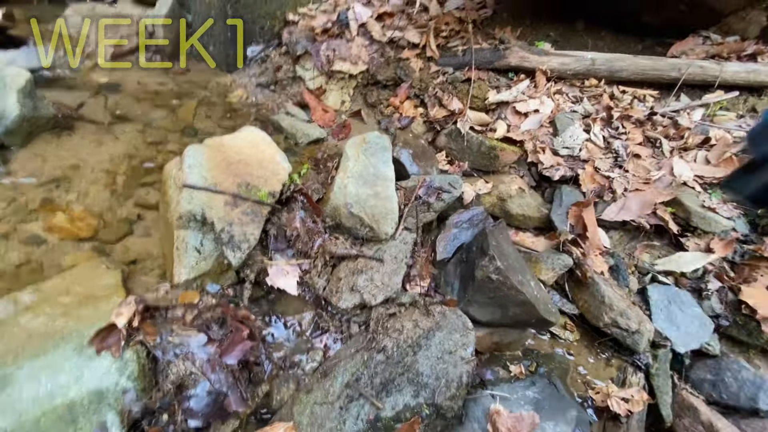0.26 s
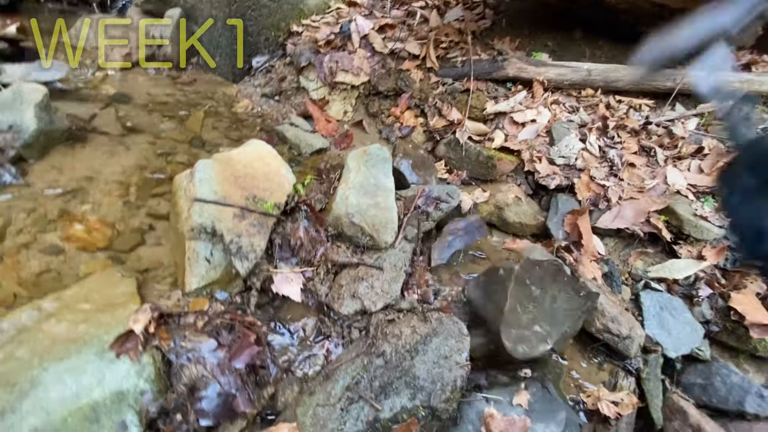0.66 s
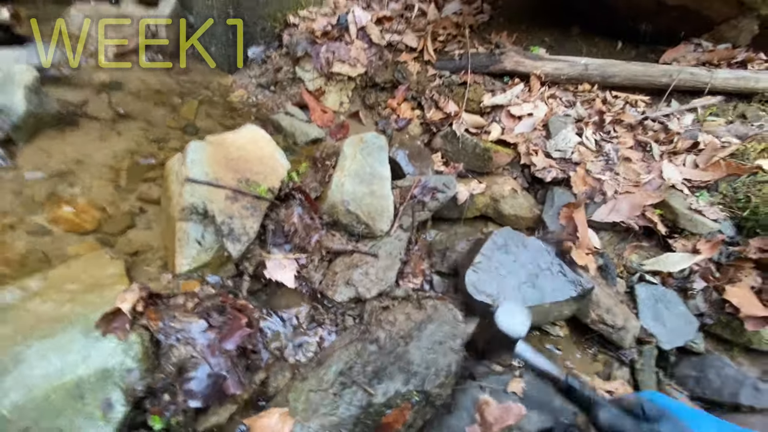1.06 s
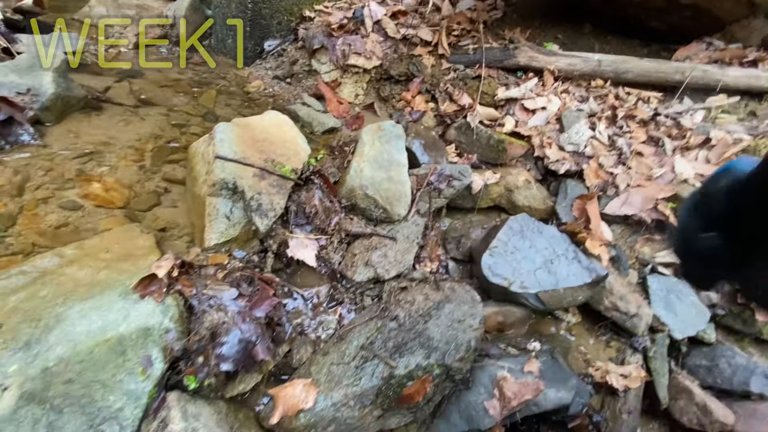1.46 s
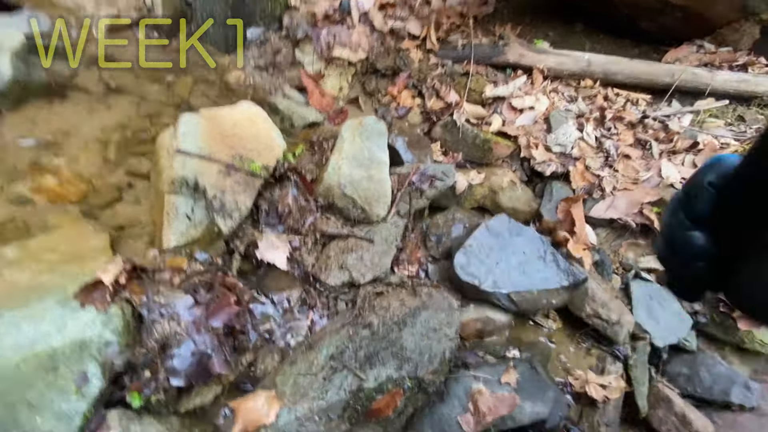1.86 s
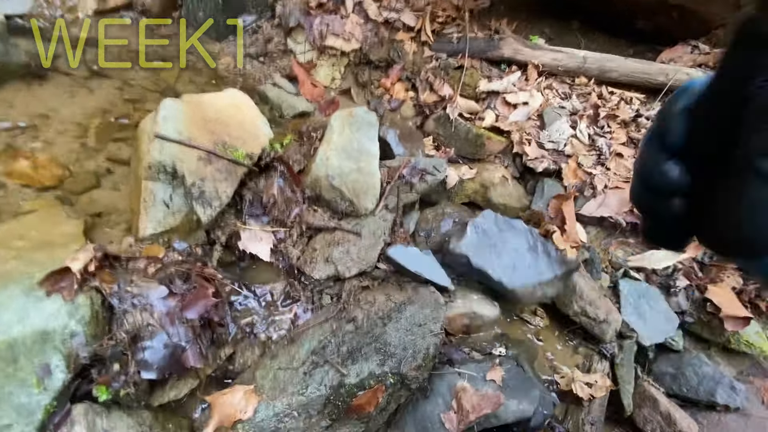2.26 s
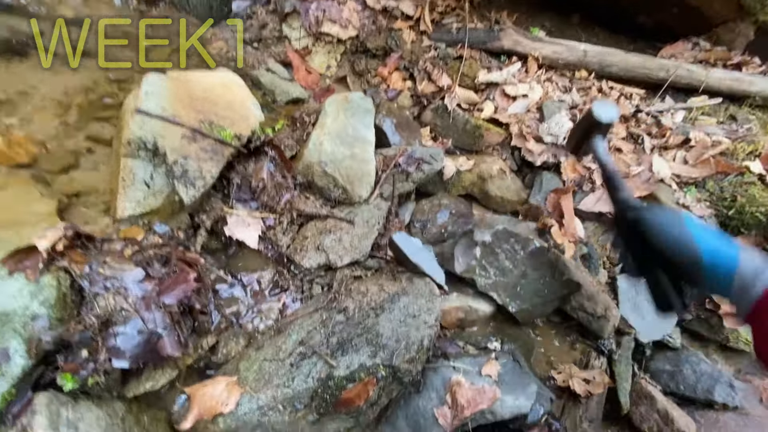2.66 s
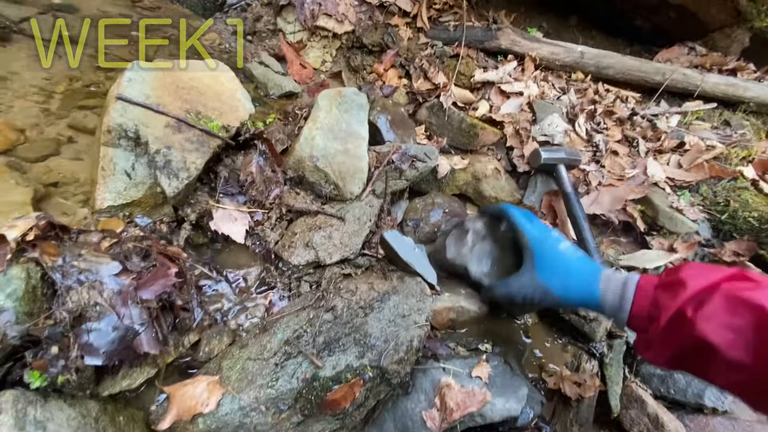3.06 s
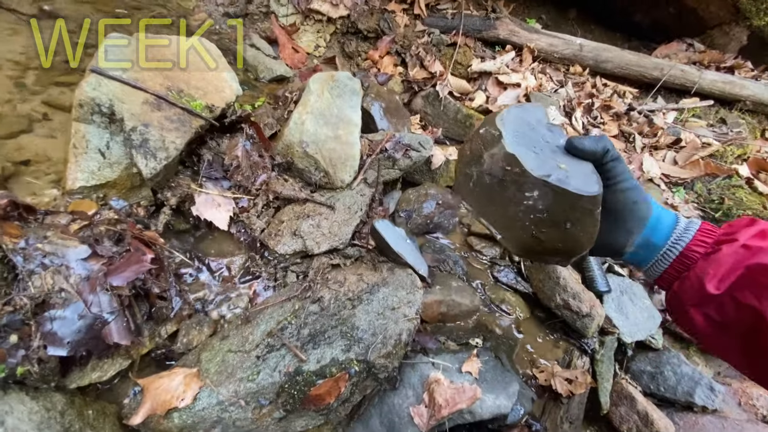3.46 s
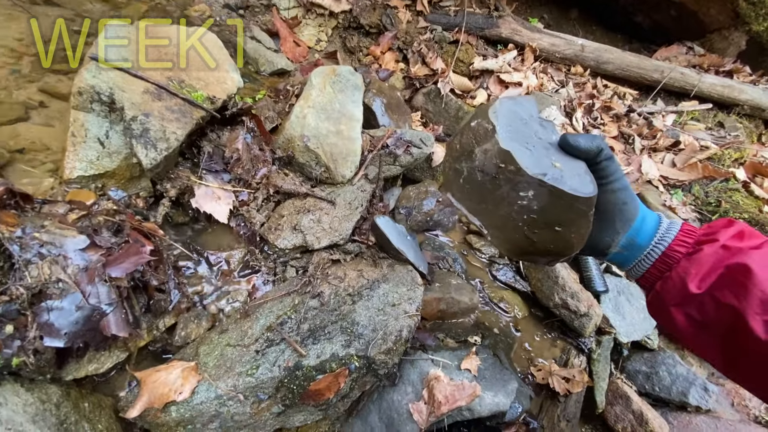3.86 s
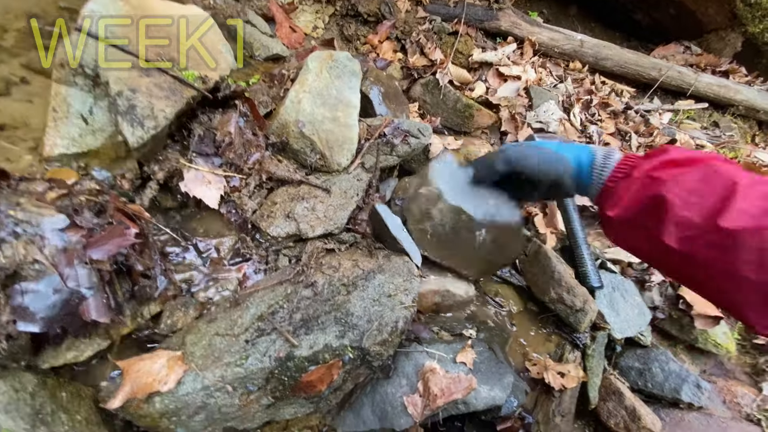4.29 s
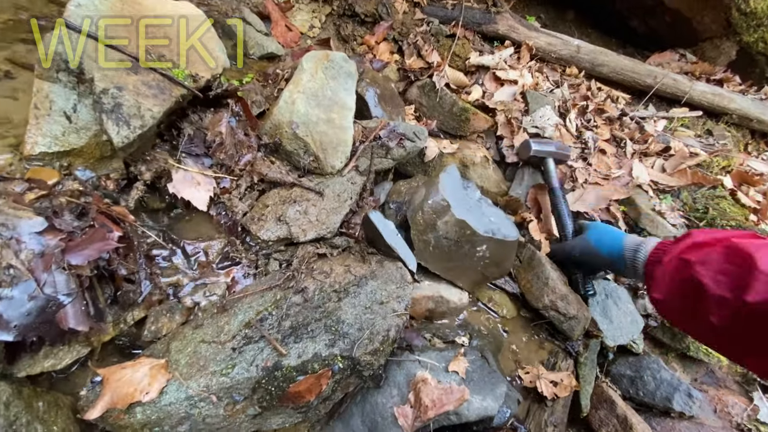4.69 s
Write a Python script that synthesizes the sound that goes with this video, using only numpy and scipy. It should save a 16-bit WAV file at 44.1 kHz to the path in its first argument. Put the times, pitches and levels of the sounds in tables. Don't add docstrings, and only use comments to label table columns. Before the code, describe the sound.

Sharp, dry hammer blows on rock, tumbling stone clacks and gritty ticks, then a stone is set down with a double knock beside a quiet stream.

```python
import sys
import numpy as np
from scipy import signal
from scipy.fft import rfft, irfft, next_fast_len
from scipy.io import wavfile
from scipy.ndimage import uniform_filter1d

SR = 44100
rng = np.random.default_rng(int(sys.argv[2]) if len(sys.argv) > 2 else 0)


def store_pcm(level_fs):
    pcm = np.round(np.clip(level_fs, -1, 1) * 32767).astype(np.int16)
    wavfile.write(sys.argv[1], SR, np.atleast_2d(pcm).T)


def volts_from_db(level):
    exponent = np.asarray(level, float) / 20
    return 10 ** exponent


N = 213179

# pitch_hz, level_db per Hz
RUMBLE_COLOUR = [(12, -28.5), (20, 1.5), (103, -3.5), (193, -3.5), (289, -23.5), (319, -13.5), (400, -6),
                 (520, -5.5), (880, -120)]
# pitch_hz, level_db per Hz
BUFFET_COLOUR = [(12, -34.5), (20, -8.5), (102, 1.5), (136, -5.5), (190, -10.5), (325, -16.5), (450, -35.5),
                 (580, -63.5), (990, -120)]
# pitch_hz, level_db per Hz
TRICKLE_COLOUR = [(120, -49), (200, -7.5), (272, -14.5), (354, -8), (513, -9.5), (894, -3), (1510, -1.5),
                  (2980, -3.5), (3530, -3.5), (8000, -15.5), (10400, -43.5), (17600, -120)]
# pitch_hz, level_db per Hz
RUSTLE_COLOUR = [(1500, -28), (3000, -18.5), (6000, -6.5), (9000, -5.5), (12000, -7.5), (15700, -17.5)]
# pitch_hz, correlation (-1 to 1)
LIKENESS = [(60, -0.52), (180, -0.39), (550, 0.33), (1650, -0.36), (4970, 0.063), (15000, -0.11)]
# time_s, trickle_db
STIRRING = [(0, -43.5), (.21, -52.5), (.44, -42), (.62, -47.5), (.97, -51), (1.06, -43.5), (1.3, -48.5),
            (1.9, -49), (2.18, -45.5), (2.45, -50), (2.6, -46.5), (2.78, -50), (2.93, -46), (3.3, -52),
            (4.1, -53), (4.25, -46.5), (4.6, -49.5), (4.83, -50)]
# middle_s, length_s, rustle_db
SLEEVE_BRUSHES = [(.06, .22, -50), (.37, .28, -50), (.58, .1, -50), (.79, .2, -50), (.95, .08, -49),
                  (1.2, .22, -50), (1.55, .09, -49), (1.74, .13, -48), (1.92, .09, -48), (2.2, .45, -49.5),
                  (2.63, .24, -47), (2.92, .14, -48), (4.27, .24, -49), (4.48, .2, -53)]
# start_s, length_s, buffet_db
ARM_SWINGS = [
    (1.415, .085, -37),
    (1.49, .1, -42),
    (2.74, .09, -51),
    (2.97, .13, -45),
]
# start_s, peak_db, pitch_hz
PLINKS = [(.1685, -43.5, 2120), (.2914, -39, 2380), (.3311, -33.5, 2960), (1.513, -29, 3360),
          (2.2258, -33.5, 3460), (2.2942, -35, 3700), (2.8055, -42.5, 3290), (3.2216, -40.5, 2600),
          (3.6287, -43.5, 2640), (3.7668, -32.5, 4570), (3.8142, -44, 2990), (3.9983, -35.5, 2040),
          (4.0467, -42, 1940), (4.2188, -28.5, 3710), (4.6319, -37, 3940), (4.6843, -45, 2620)]
# pitch_hz, t60_s
BANK_DECAY = [(150, 0.22), (1000, 0.075), (4000, 0.06), (14000, 0.02)]
# start_s, peak_db, pitch_hz
BED_THUDS = [(.04, -36, 110), (.1, -40, 90), (.398, -9, 190), (.452, -19.5, 200), (.535, -35, 140),
             (.738, -35, 200), (.811, -31, 230), (.986, -12.5, 150), (1.028, -17, 270), (1.125, -32, 240),
             (1.594, -15, 170), (1.76, -33, 100), (2.013, -9.5, 210), (2.341, -32, 190), (2.483, -25, 200),
             (2.512, -25, 180), (2.871, -21, 229), (3.175, -37, 200), (4.295, -25, 240), (4.3362, -12, 185),
             (4.437, -32, 200)]
# start_s, length_s, level_db
SAND_SCRAPES = [
    (.412, .06, -35),
    (2.48, .032, -29),
    (2.515, .022, -31),
    (2.852, .03, -37),
    (4.283, .031, -29),
    (4.343, .032, -33),
]
# start_s, peak_db, pitch_hz, pan_db
FLAKE_HITS = [(.0564, -26, 4290, 5), (.1905, -33, 6600, 5), (.2507, -38, 3840, 11),
              (.2994, -33, 5590, -2.2), (.462, -23, 3800, -6), (.7645, -28, 4410, -2.2),
              (.8015, -29, 5000, -12.5), (.8405, -29, 5260, 11.5), (1.0256, -15, 3850, 1.5),
              (1.029, -19, 3850, 6.5), (1.0495, -24, 3100, -3), (1.7953, -31, 4800, 1.5),
              (2.0445, -13, 3400, 4.5), (2.0585, -7, 3900, -8), (2.5284, -27, 4010, -3.5),
              (2.689, -34, 3650, -7), (2.8479, -24, 4340, -19), (3.3092, -37, 7450, 5),
              (3.545, -39.5, 2970, 17), (3.8396, -40.5, 2620, 9), (3.903, -33, 3900, 12),
              (4.6853, -31, 2620, 3)]
# start_s, peak_db, pitch_hz
GRIT_SPRAYS = [(1.0302, -14, 4600), (1.0495, -30, 6000), (1.0592, -22, 2510), (1.0691, -27, 4880),
               (1.0795, -21, 4250), (1.1078, -33, 6000), (1.744, -30, 12000), (2.0592, -13, 6000),
               (1.0904, -26, 4850), (1.7188, -23, 6800), (1.8933, -34, 4690), (2.4758, -31, 4400),
               (2.4845, -23, 4000), (2.5, -21, 3930), (2.5102, -13, 4000), (2.568, -36, 4000),
               (2.642, -38, 10500), (3.1787, -36, 2620), (3.472, -43, 2620), (4.2853, -28, 3500),
               (4.338, -29, 4500)]
# start_s, peak_db
HEAD_CHATTER = [
    (2.0414, -4),
    (2.0504, -12),
    (2.0594, -1.2),
    (2.0864, -25),
]
# pitch_hz, level_db per Hz
GRIT_COLOUR = [(500, -28.5), (2500, -6.5), (6000, -5), (11000, -6.5), (15700, -16)]
# start_s, peak_db, pitch_hz, t60_s
SLAB_RINGS = [(.022, -10.5, 425, 0.078), (.500, -37, 1390, 0.049), (1.612, -16, 675, .07),
              (2.52, -25, 1150, .05), (2.52, -26, 1650, .05), (2.859, -30, 3250, .03),
              (2.059, -14, 11300, 0.032), (1.000, -16, 696, 0.16), (1.170, -33, 668, 0.091),
              (1.805, -27, 1277, 0.057), (2.486, -16, 684, .12), (2.878, -36, 713, 0.2)]
# start_s, peak_db, pitch_hz
FACE_SNAPS = [(.5334, -7, 1000), (.5366, -6, 900), (.8197, -13, 1600), (1.0258, -5, 1900),
              (.7377, -17, 1000), (.8953, -30, 900), (2.0139, -5, 2000), (1.0262, -15, 6500),
              (1.031, -12, 6500), (2.0592, -7, 6500), (4.3245, -23, 9000), (1.0302, -3, 2000),
              (1.6357, -5, 1500), (1.7625, -3, 900), (2.0449, -10, 3600), (2.0515, -16, 3500),
              (2.0588, -1, 3500), (2.34, -4, 740), (2.5028, -22, 3800), (2.513, -3, 1500),
              (2.8482, -16, 2500), (4.2855, -21, 3300), (4.3262, -14, 1900), (4.327, -15, 4200),
              (4.338, -5, 800), (4.3402, -8, 2100), (4.4368, -6, 800)]
# start_s, peak_db,
# pitch_hz, held_s
HELD_MODES = [(.3965, -10, 835, .011), (.399, -8, 1280, .01), (.401, -11, 1045, .007),
              (.399, -13, 605, .009), (.398, -15, 420, .01), (.402, -19, 2340, .009),
              (.400, -18, 3470, .01), (.411, -13, 1300, .006), (.984, -9, 870, .013),
              (.9845, -5, 1325, .0145), (.986, -11, 1030, .014), (.986, -16, 1470, .012),
              (.985, -20, 2067, .01), (1.0265, -13, 2945, .007), (1.0255, -16, 3345, .01),
              (1.0285, -8.5, 960, .006), (1.028, -11, 1254, .007), (1.029, -12, 600, .006),
              (1.597, -4, 1300, .01), (1.599, -9.5, 665, .012), (1.594, -11, 1040, .014),
              (1.594, -11.5, 885, .008), (1.599, -17, 1590, .009), (1.596, -19, 2970, .011),
              (1.599, -17, 3795, .009), (2.015, -6, 1305, .008), (2.0135, -12, 1045, .013),
              (2.0135, -16, 820, .013), (2.017, -14, 675, .011), (2.014, -16, 1580, .013),
              (2.017, -17, 1840, .01), (2.014, -21, 2470, .012), (2.014, -22, 2680, .013),
              (2.51, -11, 1220, .006), (2.51, -14, 1070, .006), (2.51, -17, 1500, .005),
              (2.511, -17, 1650, .006), (2.8475, -19, 1440, .004), (2.851, -20, 1140, .006),
              (2.8475, -18, 3250, .004), (2.853, -27, 2320, .004), (4.324, -14, 1265, .004),
              (4.324, -16, 1745, .005), (4.324, -13, 470, .005), (4.324, -17, 866, .004),
              (4.3364, -4.5, 915, .004), (4.337, -9, 700, .004), (4.338, -14, 1470, .003),
              (4.345, -11, 690, .004),
              (.533, -16, 560, .005), (.533, -23, 1465, .006), (.5345, -12.5, 860, .0085),
                 (1.7621, -11, 595, .003), (1.7622, -14, 860, .002), (1.762, -19, 1270, .006),
                 (2.3396, -14, 605, .002), (2.349, -29, 620, .003), (4.4364, -16, 665, .0015),
                 (4.436, -20, 1070, .002), (.8193, -30, 950, .001), (.8193, -29, 2600, .001),
                 (1.6352, -14.5, 930, .002), (1.6352, -22, 1700, .001), (2.041, -18, 1150, .003),
                 (2.041, -19, 1750, .003), (2.033, -19, 1150, .003), (2.063, -24, 2050, .004),
                 (2.482, -25, 1650, .008), (2.0585, -18, 1550, .001), (4.2845, -22, 1050, .002),
                 (4.2845, -25, 1950, .002), (2.874, -33, 2100, .002), (.533, -28, 420, .005),
                 (1.000, -19, 1050, .005), (1.028, -20, 390, .008), (1.0265, -19, 3150, .006),
                 (1.596, -17, 480, .014), (1.598, -15, 580, .01), (1.612, -24, 520, .012),
                 (2.51, -24, 400, .006), (2.51, -21, 620, .006), (2.8475, -27, 1900, .004),
                 (4.337, -16, 400, .008), (4.337, -17, 500, .005), (4.344, -19, 1280, .003),
                 (4.436, -25, 460, .003), (2.0585, -24, 1100, .002)]
# start_s, peak_db, ring_hz, pan_db
HARD_KNOCKS = [(.021, -18, 423, -3), (.040, -15, 800, -4), (.054, -17, 900, -8), (.4518, -4, 560, 5),
               (.5325, -14, 1300, -1.5), (.7365, -20, 877, -4.5), (.8192, -23, 900, -3.5),
               (.822, -21, 2050, -1.5), (1.0255, -4, 1900, -8.5), (1.029, 2, 800, 0),
               (1.126, -12.5, 570, 5), (1.626, -15, 1100, -4.5), (1.7612, -12, 1300, -5),
               (2.3388, -21, 2300, -.6), (2.494, -11, 640, -8), (2.509, -8, 1250, -.6),
               (2.512, -12, 1420, -1.5), (2.545, -20, 600, -1.5), (4.284, -16, 1000, -.6),
               (4.3, -14, 480, -.6), (4.324, -10, 1800, -4.5), (4.3255, -9, 520, -.6), (4.3358, -3, 950, 0),
               (4.3385, -4, 1900, -4), (4.344, -8, 600, 3), (4.4356, -18, 1500, -1.5)]
# start_s, peak_db, ring_hz
SETTLING_TAPS = [(.067, -30, 1500), (.086, -28.5, 426), (.115, -33.5, 975), (.472, -23, 1120),
                 (.594, -22, 850), (.625, -25, 900), (.635, -24.5, 1100), (.774, -32.5, 585),
                 (.811, -25, 1340), (.894, -32, 950), (.916, -31, 493), (1.058, -16, 1450),
                 (1.713, -27, 650), (2.126, -26, 460), (2.243, -37.5, 783), (2.268, -29.5, 402),
                 (2.374, -32, 880), (2.396, -24.5, 720), (2.945, -25.5, 1240), (3.109, -30, 1100),
                 (4.294, -18.5, 850), (4.365, -27, 480), (4.381, -33, 430), (4.397, -33, 1400),
                 (4.457, -33, 1000), (4.514, -35.5, 436)]
# start_s, peak_db, ring_hz, pan_db
SANDY_GRINDS = [
    (2.0445, -16, 1900, -5.5),
    (2.073, -20.5, 1310, -2.5),
    (2.168, -30, 1710, -2.2),
    (2.482, -21, 705, 5),
    (2.871, -24, 1200, -2.5),
    (3.18, -32, 500, 3),
]
# start_s, peak_db, ring_hz, crack_db, pan_db
HAMMER_BLOWS = [
    (0.396, -2, 800, -19.5, -1),
    (0.984, 5, 1040, -25, -0.5),
    (1.5945, 3.5, 1185, -23.5, 0.5),
    (2.0132, 5.5, 1080, -23.5, 4),
    (2.847, -20, 1550, -14.5, 0.5),
]
# pitch_hz, strength_db
ROCK_MODES = [(430, 2.5), (520, 0.5), (600, 3.5), (685, 2.5), (780, -2.5), (865, 4), (960, 0), (1055, -0.5),
              (1180, -5.5), (1295, 0.5), (1485, -2.5), (1690, 1), (1870, -2.5), (2040, -7), (2370, -5.5),
              (2690, -7), (2960, -5.5), (3370, -7.5), (3810, -6), (4220, -6)]
# pitch_hz, level_db, t60_s
STEEL_MODES = [(7900, -25.5, .03), (9000, -41, .03), (11400, -24, .04)]
# pitch_hz, level_db per Hz
CRACK_COLOUR = [(60, -25), (250, -12), (1000, 7.5), (3000, -2.5), (6000, -13.5), (11000, -21.5),
                (16000, -26.5)]
# pitch_hz, left_over_right_db
PORT_BALANCE = [(60, 0.5), (600, -0.5), (1000, -1.5), (1600, 1), (3000, 1), (14000, 1)]
# pitch_hz, left_over_right_db
BODY_PAN = [(450, 3), (600, 8), (850, -3), (1040, -8), (1300, -2), (1500, 0), (3000, 3)]
# pitch_hz, left_lead_rad
BODY_LEAD = [(450, .4), (650, -.3), (900, -.7), (1050, 1), (1300, 1.3), (1550, 0), (2000, .4), (3200, 1.2)]

# t60_s at 1 kHz, full_scale_grit_db, grit_gain_db per dB softer, grit_brightness
HARD, SOFT, SANDY = (.019, -31, .4, 1.2), (.028, -30, .35, 1.8), (.028, -17, .35, 2.2)
# full_scale_t60_s, t60_gain_s per dB softer, hiss_db, hiss_gain_db per dB softer
FLAKE, SPRAY, HEAD = (.015, .0001, -32, .3), (.02, .0008, -12, 0), (.011, 0, -28, 0)
LEFT_RIGHT = np.array([[.5], [-.5]])


def unit(x):
    return x / np.sqrt(np.mean(x ** 2) + 1e-20)


def along(points, hz):
    f, v = np.transpose(points)
    return np.interp(np.log(hz + 1), np.log(f + 1), v)


def filtered(x, response):
    n = x.shape[-1]
    size = next_fast_len(n + 512)
    return irfft(rfft(x, size) * response(np.fft.rfftfreq(size, 1 / SR)), size)[..., :n]


def canvas(seconds):
    return np.zeros((2, N)), np.arange(int(SR * seconds)) / SR


def add(track, start_s, sound, pan_db):
    at = track[:, round(start_s * SR):][:, :sound.shape[1]]
    at += sound[:, :at.shape[1]] * volts_from_db(pan_db * LEFT_RIGHT)


def swell(start_s, length_s):
    return np.sin(np.pi * np.clip((np.arange(N) / SR - start_s) / length_s, 0, 1)) ** 2


def burst(t, colour, t60, rise=.00024):
    puff = unit(filtered(rng.standard_normal((2, len(t))), colour))
    return puff * volts_from_db(-60 * t / (abs(t60) + .003)) * (1 - np.exp(-t / rise))


def rush(colour, patchy_db, patch=(8, 6)):
    z = signal.stft(rng.standard_normal((2, N)), nperseg=256)[2]
    field = uniform_filter1d(rng.standard_normal(z.shape[1:]), patch[0], 0)
    field = uniform_filter1d(field, patch[1], 1)
    pair = signal.istft(z * volts_from_db(patchy_db * unit(field)), nperseg=256)[1][:, :N]

    def mid_side(hz):
        angle = np.arccos(np.clip(along(LIKENESS, hz), -1, 1)) / 2
        return volts_from_db(along(colour, hz)) * [np.cos(angle), np.sin(angle)]

    mid, side = filtered(pair, mid_side)
    return unit(np.array([mid + side, mid - side]))


def surroundings():
    t = np.arange(N) / SR
    trickle_db = np.interp(t, *np.transpose(STIRRING))
    stirred_db = trickle_db + 52
    shake = sum((t > s) * volts_from_db(-34 + db - 60 * np.abs(t - s) / .35) for s, db, hz in BED_THUDS)
    rumble = volts_from_db(-61 + .4 * stirred_db) + shake
    brush = sum(volts_from_db(db) * swell(s - length / 2, length) for s, length, db in SLEEVE_BRUSHES)
    rustle = np.hypot(volts_from_db(-57.5 + .4 * stirred_db), brush)
    low = rumble * rush(RUMBLE_COLOUR, patchy_db=3.5)
    water = volts_from_db(trickle_db + 2.5) * rush(TRICKLE_COLOUR, patchy_db=4, patch=(6, 3))
    leaves = rustle * rush(RUSTLE_COLOUR, patchy_db=4.5, patch=(24, 2))
    return low + water * volts_from_db(1.18 * LEFT_RIGHT) + leaves * volts_from_db(.84 * LEFT_RIGHT)


def arm_swings():
    level = sum(volts_from_db(db) * np.sqrt(swell(s, length)) for s, length, db in ARM_SWINGS)
    return level * rush(BUFFET_COLOUR, patchy_db=4, patch=(8, 5))


def bubble(t, hz, cycles):
    u = t * hz / cycles
    return np.sin(2 * np.pi * hz * t * (1 + .053 * u)) * u * np.exp(1 - 4 * u) * 4


def bubbles(count=1100):
    out, t = canvas(1 / 30)
    for s, db, hz in PLINKS:
        add(out, s, volts_from_db(db - 6.5) * np.tile(bubble(t, hz, cycles=24), (2, 1)), pan_db=13)
    for when, size, pitch, side in rng.random((count, 4)):
        tiny = bubble(t[:500], 1000 * 11 ** pitch, cycles=4.9)
        pair = np.array([tiny, -tiny * np.sign(side - .4)])
        level_db = -60 - 3.6 * np.log(size + .03)
        add(out, when * N / SR, volts_from_db(level_db) * pair, 12 * side - 3)
    return out


def bank_echoes(x):
    hz, t, z = signal.stft(rng.standard_normal((2, SR // 4)), SR, nperseg=256)
    tail = signal.istft(z * volts_from_db(-60 * t / along(BANK_DECAY, hz)[:, None]), SR, nperseg=256)[1]
    return signal.fftconvolve(x, tail / np.linalg.norm(tail[0]), axes=1)[:, :N]


def bed_thuds():
    out, t = canvas(1 / 6)
    for s, db, hz in BED_THUDS:
        swing = np.sin(2 * np.pi * hz * t + np.array([[0], [1.3]]))
        shape = volts_from_db(-60 * t * hz / 7) * (1 - np.exp(-t / .001))
        add(out, s, volts_from_db(db - 1) * swing * shape, pan_db=-1.5)
    return out


def sand_scrapes():
    spikes = rng.standard_normal((2, N)) ** 3
    grains = unit(filtered(spikes, lambda f: volts_from_db(along(CRACK_COLOUR, f / 1.2))))
    return grains * sum(volts_from_db(db) * swell(s, length) ** .2 for s, length, db in SAND_SCRAPES)


def chips():
    out, t = canvas(1 / 16)
    chatter = [(s, db, 11500, -4.5) for s, db in HEAD_CHATTER]
    sprays = [(*row, .6) for row in GRIT_SPRAYS]
    for rows, (decay, longer, hiss_db, gain) in ((FLAKE_HITS, FLAKE), (sprays, SPRAY), (chatter, HEAD)):
        for s, db, hz, pan_db in rows:
            t60 = abs(decay - longer * db) + .002
            width_hz = 300 + .03 * hz
            tick = burst(t, lambda f: 1 / np.hypot(1, ((f - hz) / width_hz) ** 2), t60, rise=.0001)
            hiss = burst(t, lambda f: volts_from_db(along(GRIT_COLOUR, f)), t60, rise=.0004)
            ping = 1.38 * np.sin(2 * np.pi * hz * t) * volts_from_db(-60 * t / (.62 * t60))
            add(out, s, volts_from_db(db - 9) * (ping + tick + volts_from_db(hiss_db - gain * db + 17.5) * hiss), pan_db)
    return out


def slabs():
    out, t = canvas(1 / 5)
    for s, db, hz, t60 in SLAB_RINGS:
        tone = volts_from_db(db - 60 * t / t60) * np.sin(2 * np.pi * hz * t) * (1 - np.exp(-t / .0025))
        add(out, s, np.tile(tone, (2, 1)), pan_db=0)
    return out


def face_snaps():
    out = np.zeros((2, N))
    t = np.arange(-SR // 200, SR // 200) / SR
    for s, db, hz in FACE_SNAPS:
        lead = along(BODY_LEAD, hz) * LEFT_RIGHT
        swing = np.exp(-(t * hz / .75) ** 2) * np.cos(2 * np.pi * hz * t + lead)
        add(out, s + t[0], volts_from_db(db + .5) * swing, along(BODY_PAN, hz))
    return out


def held_modes():
    out, t = canvas(1 / 16)
    for s, db, hz, held_s in HELD_MODES:
        swell_in = 1 - np.exp(-t / min(.0008, held_s / 6))
        sag_db = -150 * t
        damping_db = -60 * np.maximum(t - held_s, 0) / .018
        lead = along(BODY_LEAD, hz) * LEFT_RIGHT
        tone = np.sin(2 * np.pi * hz * t + lead)
        add(out, s, volts_from_db(db + 3.2) * swell_in * volts_from_db(sag_db + damping_db) * tone, along(BODY_PAN, hz))
    return out


def rock_ring(t, hz, t60, below_db, above_db, apart, rise):
    modes, strength_db = np.transpose(ROCK_MODES)[..., None]
    modes = modes * (1 + .009 * rng.standard_normal(modes.shape))
    octave = np.log2(modes / hz)
    slope_db = np.where(octave < 0, -below_db * octave, above_db * octave ** 2)
    level = volts_from_db(slope_db + strength_db + 2.2 * rng.standard_normal(modes.shape))
    fade = level * volts_from_db(-60 * t / (abs(t60) + .001) * (modes / hz) ** .24)
    shift = apart * np.log2(modes / 330) * rng.standard_normal((2, len(ROCK_MODES), 1))
    out = (fade * np.sin(2 * np.pi * modes * t + shift)).sum(1) * (1 - np.exp(-(t / rise) ** 2))
    return out / np.abs(out).max()


def knocks():
    out, t = canvas(1 / 14)
    taps = [(*row, -3) for row in SETTLING_TAPS]
    for rows, (decay, grit_db, gain, bright) in ((HARD_KNOCKS, HARD), (taps, SOFT), (SANDY_GRINDS, SANDY)):
        for s, db, hz, pan_db in rows:
            t60 = decay * (1000 / hz) ** .25
            grit = burst(t, lambda f: volts_from_db(along(CRACK_COLOUR, f / bright)), 1.4 * t60)
            grit = volts_from_db(grit_db - gain * db + 6.5) * grit
            body = rock_ring(t, hz, t60, below_db=-23.5, above_db=-13, apart=.3, rise=.0011)
            add(out, s, volts_from_db(db - .5) * (body + grit), pan_db)
    return out


def hammer_blows():
    out, t = canvas(1 / 5)
    late = np.maximum(t - .0132, 0)
    for s, db, hz, crack_db, pan_db in HAMMER_BLOWS:
        force = rng.standard_normal(len(t)) ** 3 * volts_from_db(-40 * late / .009) * (1 - np.exp(-t / .00023))
        driven = rock_ring(t, hz, .037, below_db=-6, above_db=-11, apart=.5, rise=.00063)
        driven = signal.fftconvolve(driven, force[None], axes=1)[:, :len(t)]
        free = rock_ring(t, hz, .065, below_db=-14.5, above_db=-11, apart=.56, rise=.00082)
        free = free * (volts_from_db(-60 * late / .011) + volts_from_db(-29.5))
        body = volts_from_db(-10) * free + volts_from_db(-9) * driven / np.abs(driven).max()
        crack = burst(t, lambda f: volts_from_db(along(CRACK_COLOUR, f)), t60=9)
        crack = crack * (volts_from_db(-60 * late / .017) + volts_from_db(-10 - 60 * late / .2))
        crack = filtered(crack, lambda f: (.5 + (f / 3000) ** 2) / (1 + (f / 3000) ** 2))
        steel = sum(volts_from_db(g + rng.normal(0, 3) - 60 * t / t60) * np.sin(2 * np.pi * f * t)
                    for f, g, t60 in STEEL_MODES)
        add(out, s, volts_from_db(db) * (body + volts_from_db(crack_db + 15) * (crack + steel)), pan_db)
    return out


def scene():
    rocks = chips() + slabs() + face_snaps() + held_modes() + knocks() + hammer_blows()
    rocks = filtered(rocks, lambda hz: (1j * hz / (255 + 1j * hz)) ** 4)
    stream = surroundings() + arm_swings() + bubbles()
    return stream + bed_thuds() + sand_scrapes() + volts_from_db(-18.5) * bank_echoes(rocks) + rocks


def low_pass(x):
    return signal.sosfilt(signal.butter(12, 15820, fs=SR, output="sos"), x)


def record(dry):
    ports = filtered(dry, lambda hz: volts_from_db(along(PORT_BALANCE, hz) * LEFT_RIGHT))
    squeezed = ports / (1 + np.abs(ports / 3.85) ** 3) ** (1 / 3)
    limited = filtered(squeezed, lambda hz: np.clip((15900 - hz) / 250, 0, 1))
    return low_pass(np.clip(limited, -1, 1))


dry = scene()
out = record(dry)
store_pcm(out)
```